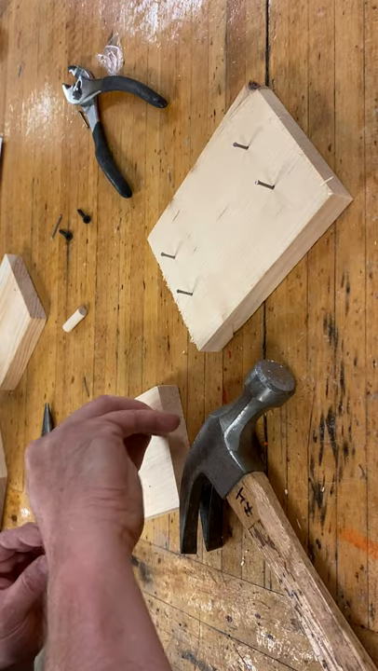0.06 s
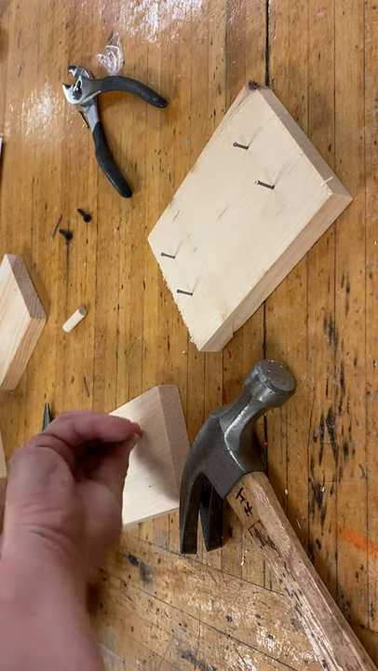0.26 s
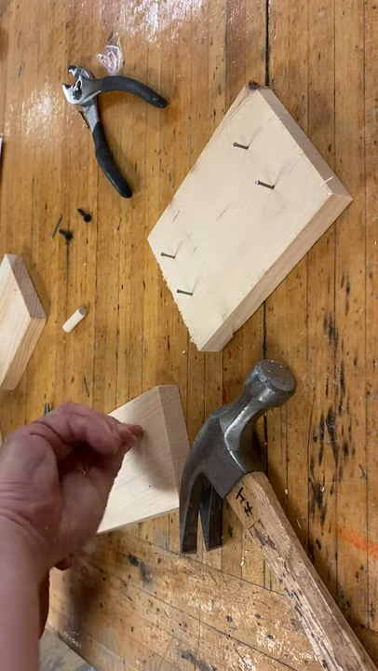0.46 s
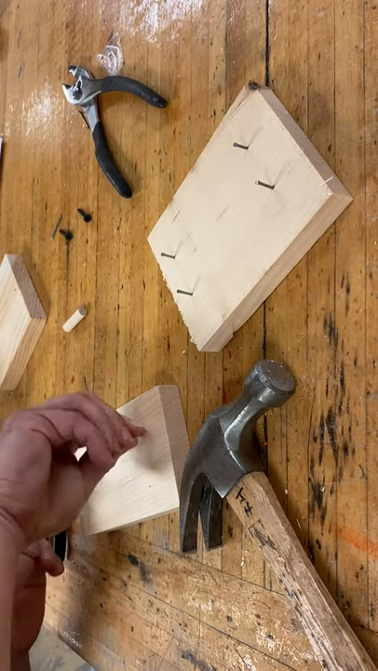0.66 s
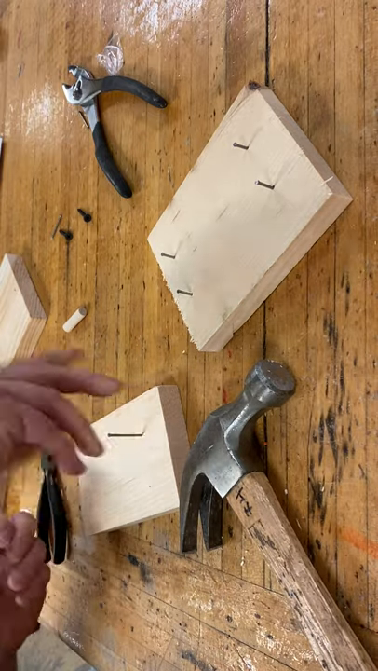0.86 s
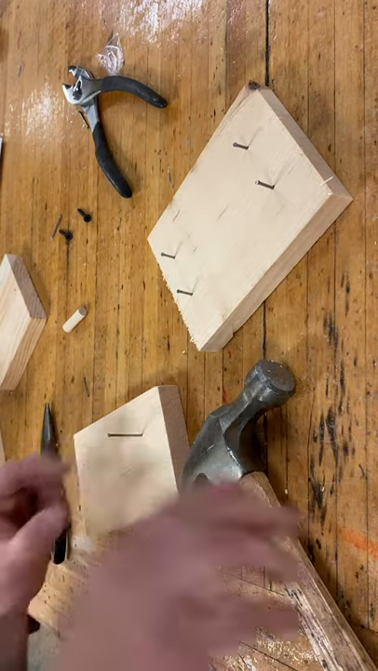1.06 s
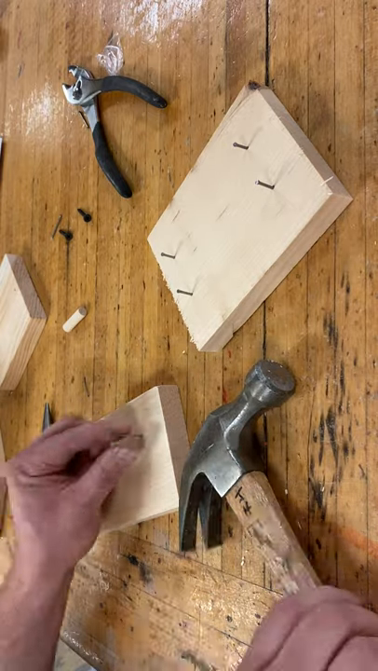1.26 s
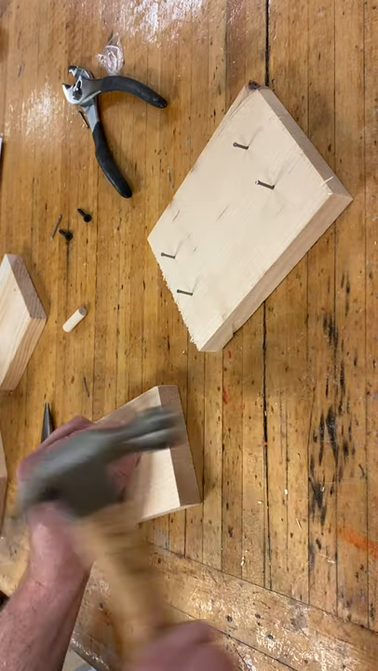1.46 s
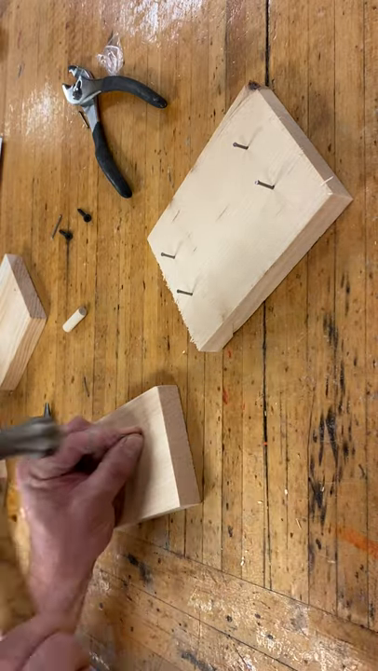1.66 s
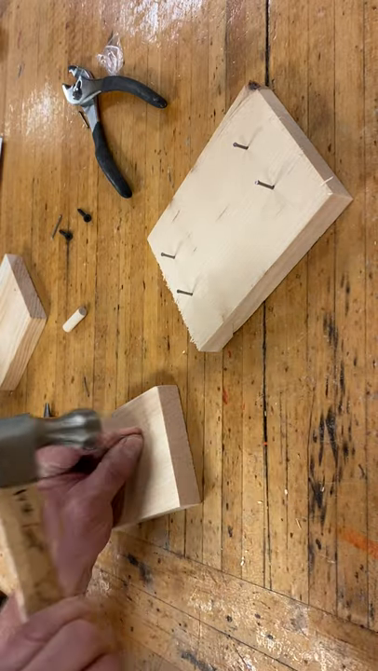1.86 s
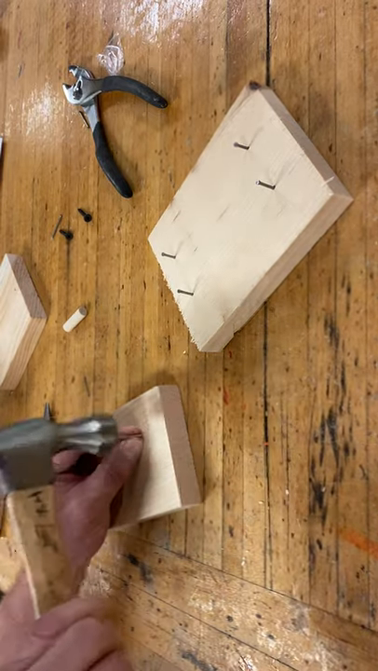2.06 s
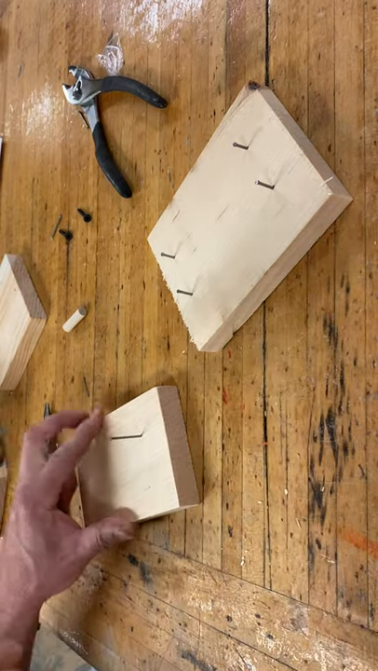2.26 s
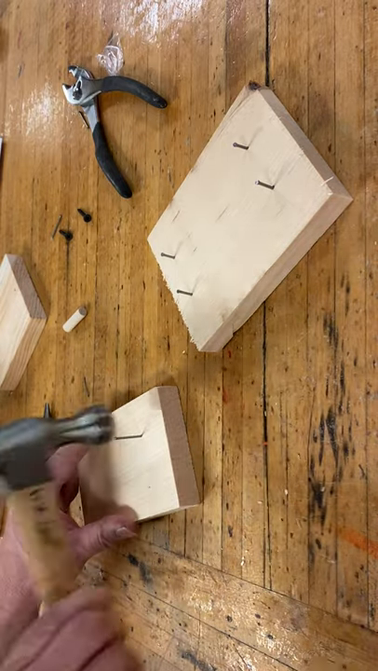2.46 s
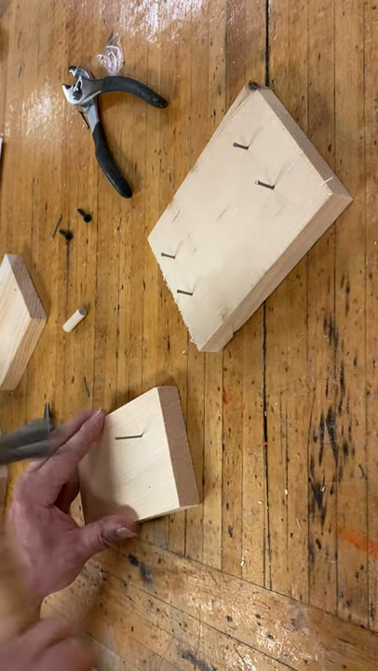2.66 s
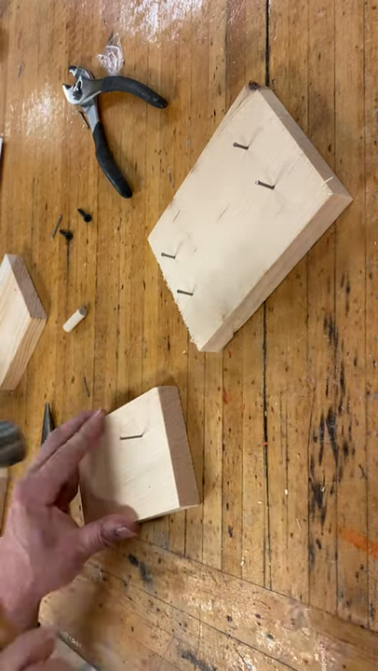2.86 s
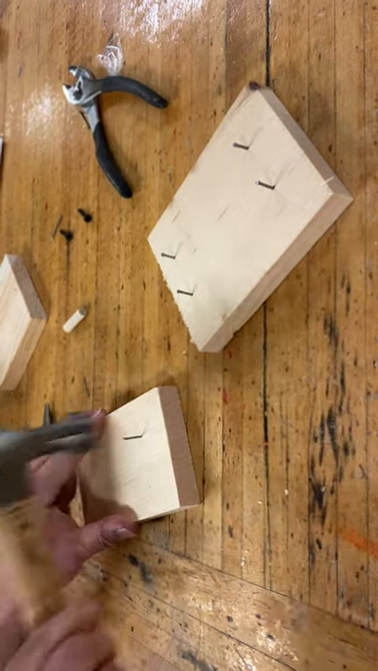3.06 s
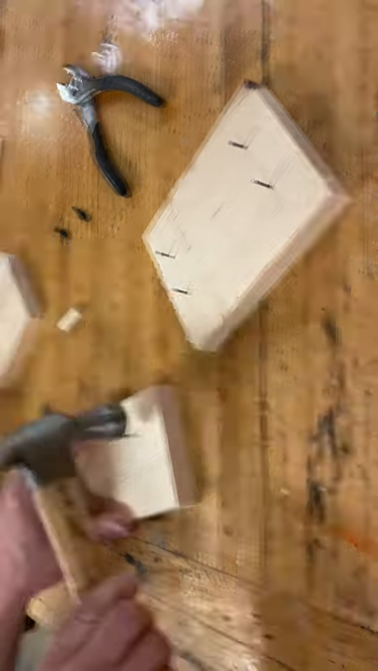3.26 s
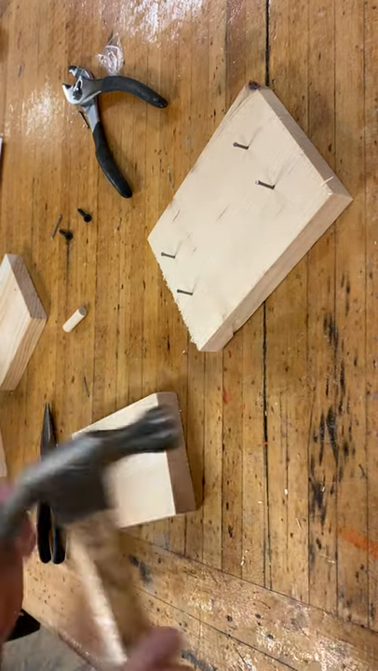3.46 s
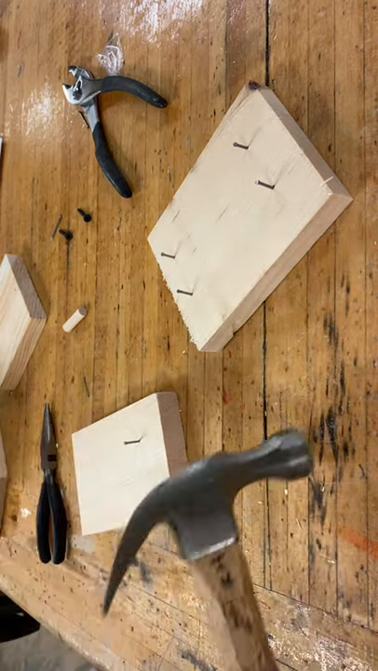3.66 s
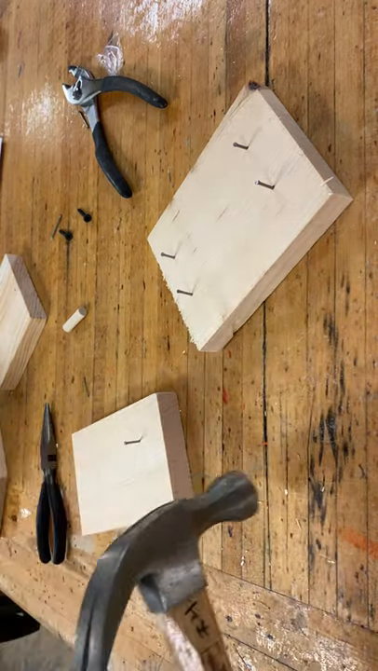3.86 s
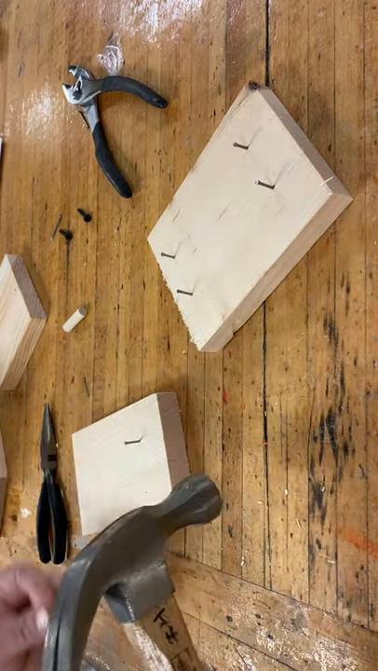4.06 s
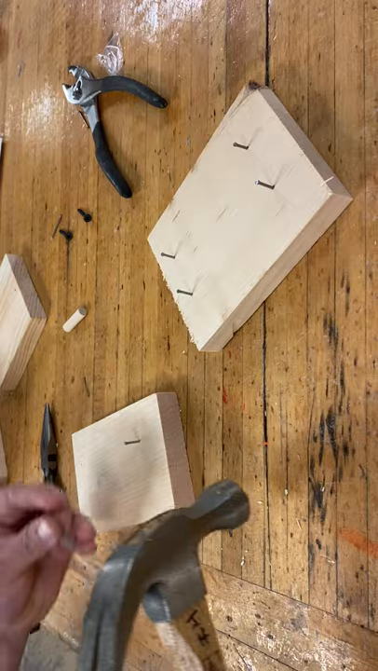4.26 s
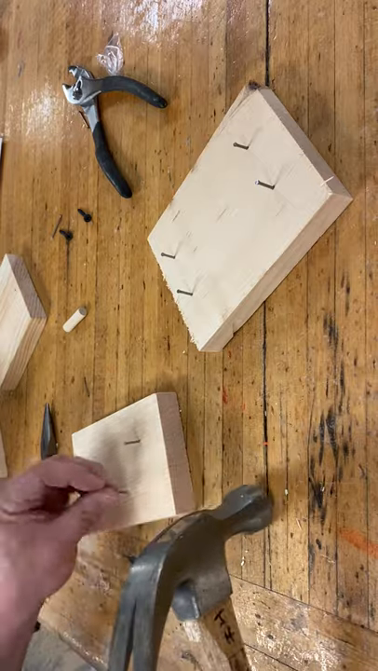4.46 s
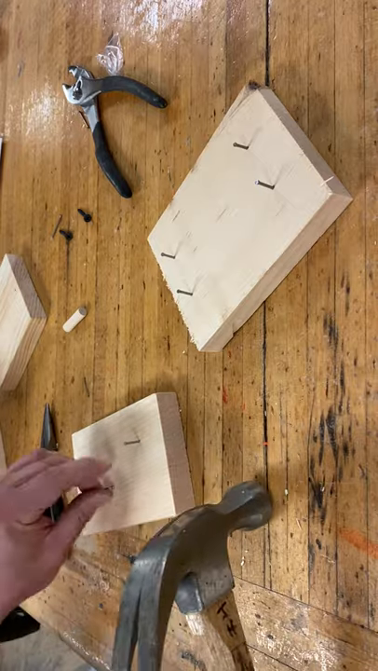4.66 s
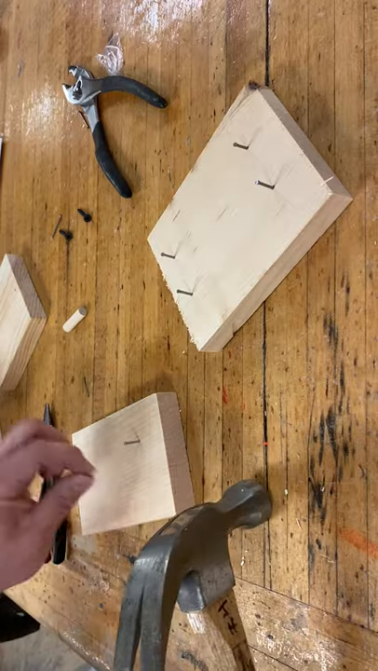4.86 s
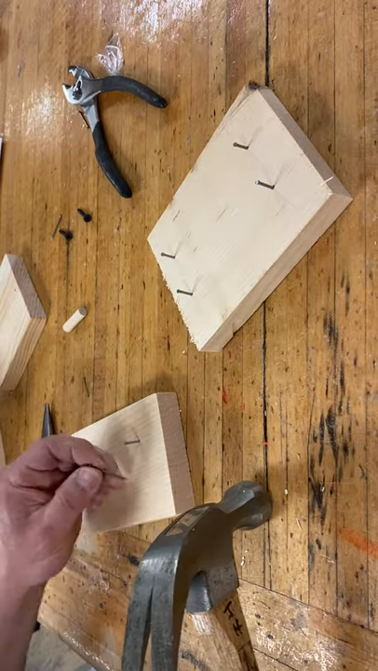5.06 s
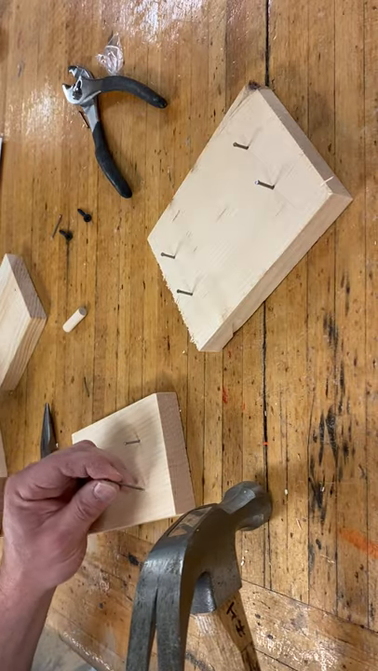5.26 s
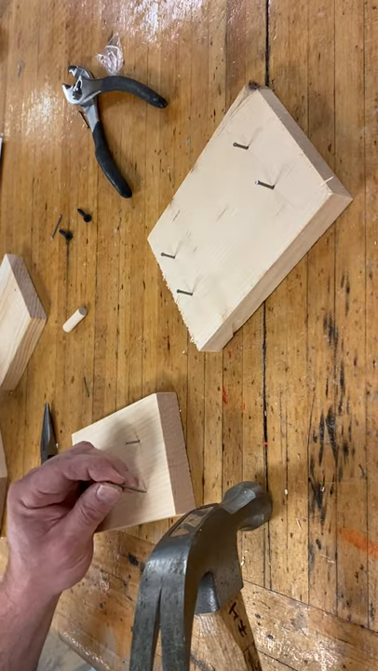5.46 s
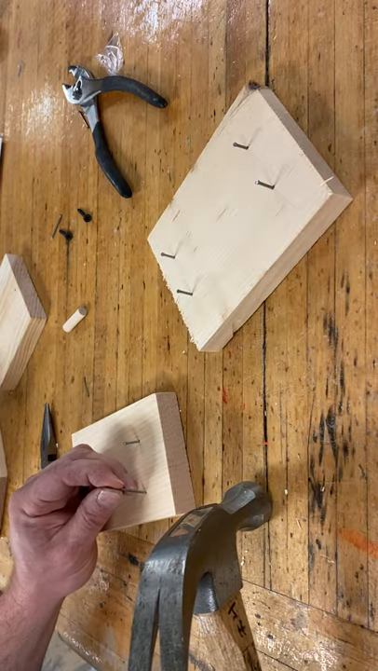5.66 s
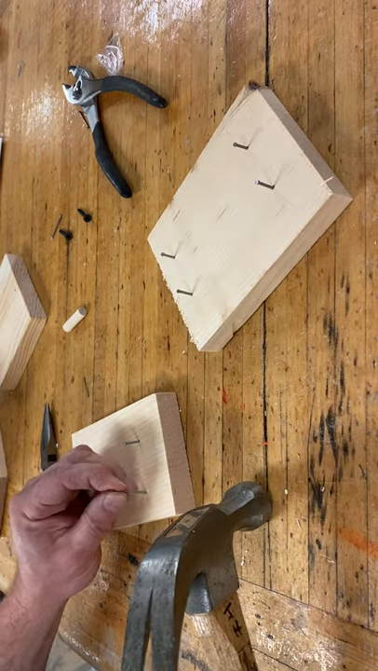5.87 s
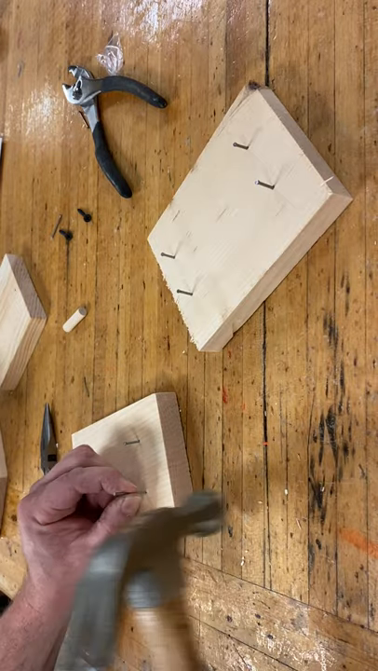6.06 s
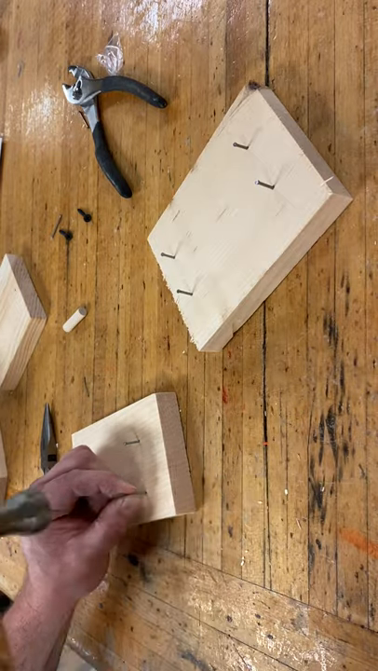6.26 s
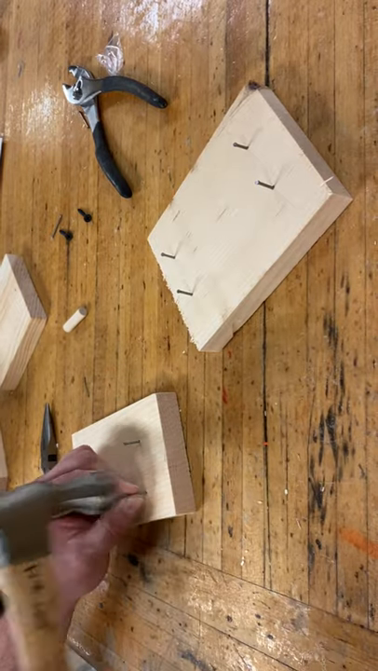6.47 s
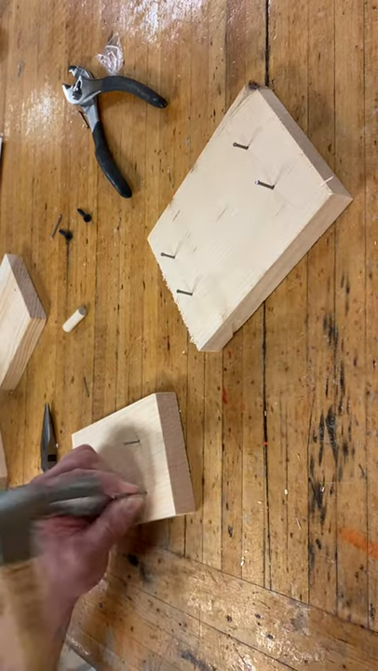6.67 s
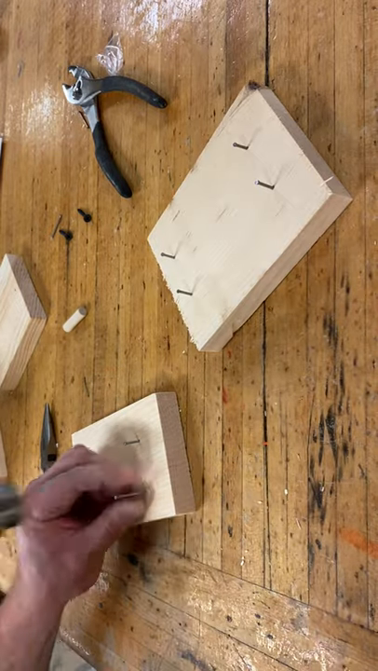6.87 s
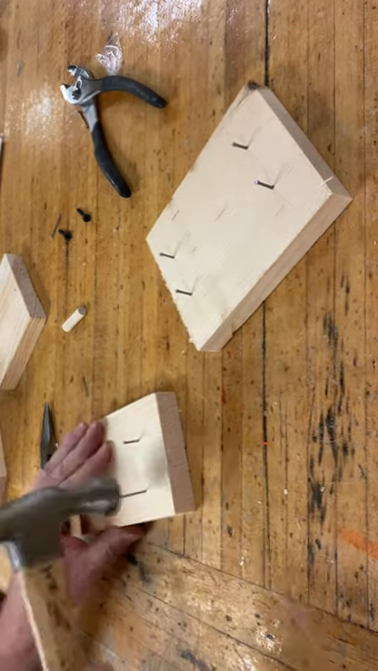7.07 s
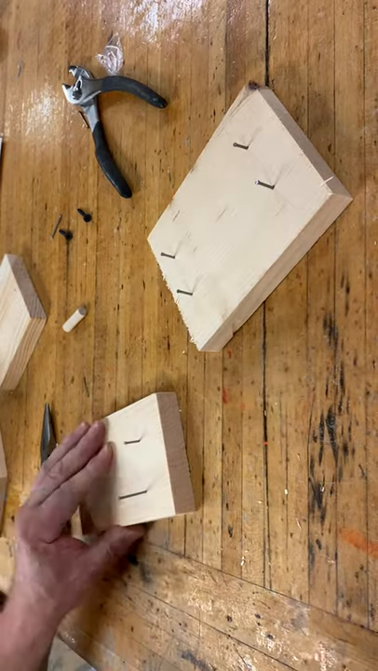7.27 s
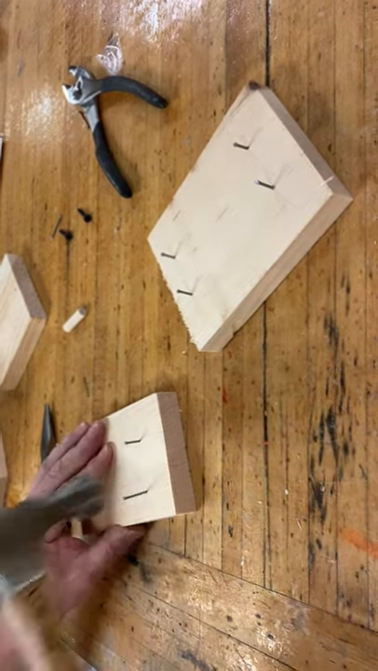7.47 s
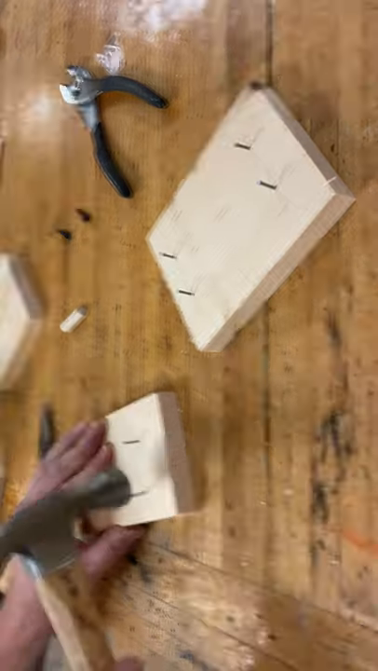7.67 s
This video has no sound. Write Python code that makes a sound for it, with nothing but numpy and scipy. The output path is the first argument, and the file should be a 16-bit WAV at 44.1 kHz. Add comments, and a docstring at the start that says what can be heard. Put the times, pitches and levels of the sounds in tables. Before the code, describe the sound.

Near stereo pickup in a moderately live workshop with steady, faint low hum and airy rumble. Light nail and finger ticks lead into six sharp steel-on-nail cracks, each with woody knock, deep bench thud and short room tail. The hammer lands and rocks on the bench in a brief cluster of knocks. Near-silent fingering follows, then a run of four blows, starting muffled and ending loud and crisp.

```python
"""Fingers rustle and tick on a softwood block (shaped noise); then a claw hammer drives a nail with six blows,
each a sum of damped modes and noise bursts, and loose things on the bench buzz on. The hammer is laid down and
rocks on the heavy bench top, its claw rattling; after more rustling a second run of four blows follows.
Mains hum (two sines) and ventilation (patchy noise) last throughout; decaying diffuse noise is the workshop's
answer to each knock. Two microphone ports a few centimetres apart hear it with unlike phase and level."""
import sys
import numpy as np
from scipy import signal
from scipy.fft import rfft, irfft, next_fast_len
from scipy.io import wavfile
from scipy.ndimage import uniform_filter1d, map_coordinates

SR = 44100
rng = np.random.default_rng(int(sys.argv[2]) if len(sys.argv) > 2 else 0)


def file_out(sig):
    """Save sig as 16-bit WAV at sys.argv[1]."""
    # one column per channel
    cols = np.atleast_2d(sig).T
    # limit, then scale
    lim = np.clip(cols, -1, 1)
    pcm = np.round(lim * 32767).astype(np.int16)
    wavfile.write(sys.argv[1], SR, pcm)


N = 339966

# Blows on the nail: start_s, load_steps (delay until the wood takes the load, in LOAD_STEP_S), tone_hz (block),
# crack_hz (wood), bite_hz (nail), crack_db, tone_db, block_db, bench_db, bite_db, clink_db (face),
# steel_db (treble), low_ring_db and high_ring_db (head), room_db (re blow)
BLOWS = [(1.8180, 1.4, 430, 1160, 1820, -11, -26, -21.5, -14, -34, -34, -27, -51.5, -54, -30.5),
         (2.0791, 0.57, 660, 1284, 1873, -6, -15, -11, -13, -12.5, -18.5, -20, -54, -51.5, -27),
         (2.4517, 0.46, 652, 1330, 2130, -17.5, -18, -14, -12, -12.5, -12, -18.5, -46, -45, -22),
         (2.7653, 0.76, 648, 1276, 2410, -15.5, -19, -13.5, -14.5, -13, -12, -16.5, -52, -49, -24),
         (3.041, 1.2, 650, 1320, 2420, -16.5, -17.5, -12, -14, -12.5, -10.5, -15.5, -63, -48, -27),
         (3.302, 0.82, 602, 1362, 2371, -18.5, -15.5, -11.5, -14.5, -12.5, -10, -16, -54, -50.5, -27.5),
         (6.4615, 1.4, 560, 1404, 1850, -33, -26, -33.5, -15, -37, -38.5, -26.5, -50.5, -59.5, -30.5),
         (6.7540, 0.83, 800, 1007, 2045, -17, -19.5, -19.5, -12, -19.5, -21, -14.5, -55, -38, -25.5),
         (7.131, 1.2, 704, 1176, 3590, -13, -10.5, -9.5, -9.5, -12.5, -24, -8, -43, -52, -28),
         (7.446, 1.1, 713, 1236, 3430, -11.5, -9.5, -9.5, -9.5, -13, -15.5, -8, -38.5, -35, -26)]
LOAD_STEP_S, CRACK_RISE_S, BLOCK_TONE_T60_S = 0.00091, 0.0009, 0.038
# Weights of the parts in the room: crack, steel, block, clink and tone, each re its own direct level
ROOM_CRACK_DB, ROOM_STEEL_DB, ROOM_BLOCK_DB, ROOM_CLINK_DB, ROOM_TONE_DB = -2.5, -10, 5, -5.5, 0.5
# Short narrow tones swelling just before some blows: start_s, length_s, first_hz, level_db
LEAD_TONES = [(2.4405, .008, 3140, -34), (2.7562, .0075, 2658, -24.5), (3.032, .007, 2780, -22.5),
              (3.29, .0125, 2565, -18), (7.1224, .006, 3077, -30.5), (7.435, .007, 2910, -31)]
TONE_GLIDE, TONE_SWELL_DB, TONE_NOISE_DB = 1.1, 10, -5  # last over first pitch, swell, noise re tone
# Steel contact spectrum: frequency_hz, level_db (per Hz)
STEEL_SPECTRUM = [(6000, -23), (7000, -5.5), (9500, -3.5), (12000, -12), (15500, -6), (16300, -25.5),
                  (17000, -36.5)]
FACE_HZ, FACE_DB, FACE_T60_S = 9680, -12, 0.005  # short high ring of the hammer face, re steel treble
# Modes of the steel hammer head: frequency_hz, t60_s
HEAD_MODES = [(4511, 0.18), (5740, 0.21), (6800, .12)]
HEAD_TOP_DB = -5.5  # highest ring re the lowest
# Modes of the softwood block: frequency_hz, level_db (relative), t60_s
BLOCK_MODES = [(279, 5, 0.025), (350.1, -4, 0.067), (570, -3.5, 0.05), (1360, -12, 0.072),
               (2470, -17.5, 0.051), (3150, -21.5, 0.032)]
# Modes of the bench top: frequency_hz, level_db (relative), t60_s
BENCH_MODES = [(50, -28, 0.21), (61.97, -7.5, 1), (74.42, 7.5, 0.16), (84.2, -18.5, 0.95), (100, -30, 0.56),
               (108.37, -6, 0.43), (137, -6, 0.21), (155.75, -15, 0.18), (171, -25, .25),
               (180.2, -12.5, 0.36), (203, -19, 0.67), (221, -7, 0.055), (317, -29, 0.08),
               (348.9, -10, 0.17), (410.1, -6, 0.099)]
# Loose low rattle of the bench; softer thuds stretch its frequencies: frequency_hz, level_db (per Hz)
THUD_SPECTRUM = [(30, -32), (60, 2.5), (150, 5.5), (300, -6.5), (600, -21.5), (1200, -34.5), (2500, -51.5)]

# Loose things buzzing after blows of the first run: start_s, hold_s, level_db (rms before sag and rise)
RATTLES = [(2.085, .15, -57), (2.46, .15, -51), (2.775, .18, -47.5), (3.05, .2, -44.5), (3.31, .22, -45.5)]
RATTLE_SAG_DB_PER_S, RATTLE_FALL_DB_PER_S, RATTLE_GRAIN_DB = 35, 169, 2.5
# Spectrum of the buzz: frequency_hz, level_db (per Hz)
RATTLE_SPECTRUM = [(300, -40.5), (600, -9.5), (1100, -7.5), (1500, -5), (1800, -1.5), (2300, 1.5),
                   (2650, 0.5), (3000, -8.5), (4100, -12.5), (5100, -8), (6200, -14.5), (7200, -40.5)]
RATTLE_PEAKS_DB, RATTLE_PEAK_HZ = 4, 45  # many narrow resonances: depth and spacing

# The hammer landing and rocking: start_s, knock_db, bench_db, edge_db (edge of the contact) and
# claw_db (claw rattle), these three re knock, claw_hz
KNOCKS = [(3.680, -10.5, -14, -24.5, -24.5, 4300), (4.472, -6.5, -15.5, -20.5, -25, 4364),
          (4.512, -25.5, -2.5, -27, -19.5, 3300), (4.586, -9.5, -16, -20, -27.5, 4350),
          (4.634, -16.5, -18.5, -28, -43.5, 4600), (4.661, -22.5, -3.5, -22.5, -33, 5200),
          (4.7, -35, -1, -38, -42, 4540), (4.761, -48, -3, -27.5, -9, 3610)]
# Modes of the bench under the laid hammer: frequency_hz, level_db (relative), t60_s
LAID_MODES = [(183, -9.5, 0.19), (228.5, -13.5, 0.33), (311.8, 6, 0.043), (369.6, -7.5, 0.05),
              (463, -14, 0.24), (487, -5, 0.07), (560, 1.5, 0.046), (659, -24.5, 0.13), (737, -23.5, 0.17),
              (900, -19.5, 0.016), (968, -30, 0.14), (1227, -22.5, 0.078)]
KNOCK_RISE_S, CLAW_AFTER_S = .0016, .007

# Ticks of nails and fingers: start_s, tick_db, thump_db (re tick), tap_db (woody, re tick)
TICKS = [(0.211, -62, -16, -15), (0.2442, -62.5, -18.5, -11), (0.9448, -71, 22.5, -10),
         (0.982, -69, -20, 6), (1.17, -62, -17, -8), (1.2118, -58.5, 10, 3), (1.226, -58.5, 16.5, -10),
         (1.2348, -55, 16.5, -11), (1.343, -73, 25, -9), (1.3574, -62, 6, -9), (1.4044, -67.5, 30.5, 0),
         (1.4163, -60, 23.5, 10), (1.424, -56.5, 14, 4), (1.4975, -71, 21.5, -10), (1.546, -57.5, 1, -10),
         (5.348, -74.5, 0, 2), (5.5995, -71, 6, 5.5), (5.6699, -67, 11, -1), (6.3801, -75, 8, -6),
         (7.0584, -51.5, 10.5, -11.5)]
FAINT_DB, FAINT_THUMP_DB, FAINT_TAP_DB = -78, 5.5, 1.5  # fainter ticks at random moments
FAINT_SCATTER_DB = 2.5
# Spectrum of skin on wood: frequency_hz, level_db (per Hz)
SKIN_SPECTRUM = [(350, -27), (700, -2), (2500, -6.5), (5000, -6), (10000, -10.5), (15500, -13),
                 (16300, -35), (17000, -52)]
# Skin sliding on wood: start_s, hold_s, level_db (rms while held)
STROKES = [(0.825, 0.0065, -61), (0.987, .01, -73.5), (1.213, 0.013, -67), (1.273, 0.011, -60.5),
           (1.353, 0.19, -78.5), (2.187, 0.09, -60), (4.774, 0.033, -74.5), (4.93, 0.0086, -77),
           (5.036, 0.0096, -83.5), (5.14, 0.009, -85), (6.007, 0.015, -81), (6.145, 0.019, -86.5),
           (6.388, 0.0066, -77.5), (6.949, 0.013, -63), (7.107, 0.038, -59.5)]
RISE_DB_PER_S, FALL_DB_PER_S = 352, 246.5
GRAIN_DB = 3.5  # skin catches and slips on the grain
# A faint thin squeak under the fingers: start_s, length_s, pitch_hz, level_db (rms at its height)
SQUEAK = (1.33, .12, 4800, -80)
# Short faint scuffs, each around one pitch: start_s, length_s, pitch_hz, level_db (rms before shaping)
SCUFFS = [(.07, .05, 1050, -75), (0.241, 0.045, 1150, -81), (.245, .08, 5300, -83), (0.408, .07, 1100, -72),
          (.43, .07, 5000, -86), (.605, 0.044, 1100, -75), (.61, 0.065, 5000, -86), (1.168, .04, 1200, -74),
          (1.207, 0.047, 950, -60), (1.72, .025, 1300, -76), (2.3, 0.017, 3900, -64), (2.3, .02, 5400, -70),
          (4.878, 0.076, 1250, -74), (4.925, 0.033, 3005, -78.5), (5.0, 0.076, 1000, -82),
          (5.11, .04, 4790, -83), (5.345, 0.048, 1693, -82.5), (5.421, 0.054, 1300, -81),
          (5.553, .05, 1050, -83), (5.952, 0.084, 698, -78), (5.971, .08, 1996, -85),
          (6.001, .04, 5320, -86), (6.127, .06, 5000, -83.5), (6.142, 0.089, 780, -79.5),
          (6.17, .07, 1698, -85.5), (6.331, 0.083, 1404, -81), (6.973, .02, 5200, -64)]
SCUFF_WIDTH = 0.13  # log bandwidth

# Workshop background: frequency_hz, level_db (per Hz, relative)
AIR_SPECTRUM = [(15, -58.5), (30, -20), (52, -7), (62, -2.5), (85, -11), (150, -12.5), (260, -19),
                (430, -26.5), (560, -34), (850, -38.5), (1300, -41), (2500, -48), (5000, -55),
                (10000, -56.5), (15700, -69.5), (16200, -92.5)]
AIR_DB = -57  # rms
# Mains hum: pitch_hz, level_db (rms)
HUM = [(59.6, -70), (119.3, -50.5)]
# Early decay of the workshop: frequency_hz, t60_s
ROOM_DECAY = [(100, 0.93), (400, 0.46), (1000, 0.27), (1600, 0.4), (2300, 0.32), (3500, 0.39), (5000, 0.28),
              (7000, 0.36), (14000, 0.16)]
# Colour of the workshop's answer: frequency_hz, level_db
ROOM_COLOUR = [(100, 5), (500, -5.5), (1000, -0.5), (1600, -4.5), (2300, 2), (3200, -3), (4200, -4),
               (5100, -5), (7000, -11), (11000, 0.5), (16000, 4)]
LATE_DB, LATE_LONGER = -10, 1.836  # the far end of the workshop answers weaker and dies slower
ROOM_UNEVEN_DB = 2.5  # neighbouring frequencies of the tail differ in level
# Diffuse sound at the ports: frequency_hz, likeness (left-right correlation, 0 to 1)
LIKENESS = [(100, .99), (300, .85), (700, .35), (2000, .4), (4000, .6), (6000, .99)]
# Phase between the ports: frequency_hz, left_lead_rad
LEFT_LEAD = [(0, 0), (550, -.4), (1100, .3), (1800, 0), (2700, 1.5), (3400, .8), (5200, .6), (7200, np.pi),
             (16500, 4 * np.pi)]
# Level between the ports: frequency_hz, left_minus_right_db
LEFT_TILT = [(30, -.7), (125, -1.6), (250, -3), (550, -5.5), (1100, -1.8), (2000, -.5), (4400, -1),
             (5300, 1.5), (7000, .3)]
TOP_HZ = 17000
CEILING, KNEE = .95, 6  # the loudest peaks are rounded off


def blows():
    """Impact excitation: each blow cracks on the nail, rings head, block and bench, and fills the room."""
    out, t = np.zeros((2, N + 2 * SR)), np.arange(SR // 2) / SR
    wood = lambda f: hump(f, 1024, 0.6)
    clink = lambda f: hump(f, 5600, 0.26)
    steel = lambda f: amp(along(STEEL_SPECTRUM, f))
    block = lambda f: hump(f, 436, 0.38)
    swell = 1 - np.exp(-(t / CRACK_RISE_S) ** 2)
    for start, length, first_hz, lead_db in LEAD_TONES:
        add(out, start, amp(lead_db) * lead_tone(first_hz, length))
        add(out, start + length, amp(lead_db - 19.5) * room(lambda f: spike(f, first_hz, 45)))
    for start, load_steps, tone_hz, crack_hz, bite_hz, *levels_db in BLOWS:
        crack_db, tone_db, block_db, bench_db, bite_db, clink_db, steel_db, *head_db, room_db = levels_db
        bite = lambda f: hump(f, bite_hz * 0.8, 0.74)
        tone = lambda f: hump(f, tone_hz, 0.16)

        # steel meets steel first; the face touches again on the rebound
        rebound = np.roll(burst(t, 0.052, steel), round(0.0037 * SR))
        spark = burst(t, 0.01, steel) + amp(-17.0) * rebound
        spark += amp(FACE_DB) * ring([(FACE_HZ, 0, FACE_T60_S)], t, 0)
        add(out, start, amp(steel_db) * spark + head(t, head_db))

        nail = ring([(bite_hz, 0, .015)], t, 1.5)
        nail += amp(6.5) * burst(t, 0.025, bite) + amp(-7.5) * burst(t, 0.17, bite)
        add(out, start + 0.0006, amp(bite_db) * nail + amp(clink_db) * burst(t, 0.021, clink))

        # the wood takes the load a moment later
        crack = 1.8 * swell * ring([(crack_hz, 0, .009)], t, 1.5)
        crack += amp(-6.5) * burst(t, 0.057, wood, attack=0.001)
        body = amp(block_db) * ring(BLOCK_MODES, t, 1.3, travel=0.016) + amp(bench_db) * bench(t)
        body += amp(tone_db) * ring([(tone_hz, 0, BLOCK_TONE_T60_S)], t, 1, travel=0.04)
        add(out, start + load_steps * LOAD_STEP_S, amp(crack_db) * crack + body)

        # the room answers the whole blow, each part with its own weight
        weights = amp([crack_db + ROOM_CRACK_DB, bite_db, clink_db + ROOM_CLINK_DB,
                       steel_db + ROOM_STEEL_DB, block_db + ROOM_BLOCK_DB, tone_db + ROOM_TONE_DB])
        parts = wood, bite, clink, steel, block, tone
        answer = room(lambda f: sum(w * part(f) for w, part in zip(weights, parts)))
        add(out, start, amp(room_db) * np.linalg.norm(weights) * answer)
    return out[:, :N]


def lead_tone(first_hz, length):
    """Gliding tone: a short rising tone with narrow noise swells up to the blow."""
    u = np.linspace(0, 1, round(length * SR))
    tone = np.sin(2 * np.pi * np.cumsum(first_hz * TONE_GLIDE ** u) / SR)
    noise = rng.standard_normal(len(u))
    narrow_noise = unit(filtered(noise, lambda f: spike(f, first_hz * TONE_GLIDE, 120)))
    swell = amp(-TONE_SWELL_DB * (1.0 - u)) * np.minimum(8 * u, 1)
    return swell * (tone + amp(TONE_NOISE_DB) * narrow_noise)


def head(t, levels_db):
    """Free vibration: the steel head's clear rings are exponentially damped sines."""
    all_db = [*levels_db, levels_db[0] + HEAD_TOP_DB]
    return sum(amp(db - 60 * t / t60) * np.sin(2 * np.pi * hz * t)
               for (hz, t60), db in zip(HEAD_MODES, all_db))


def bench(t):
    """Modal plate vibration: the bench top's modes, roughened by everything loose that lies on it."""
    loose = burst(t, 0.45, lambda f: amp(along(THUD_SPECTRUM, f)), attack=0.0017)
    return -ring(BENCH_MODES, t, 1.2, travel=0.0698) + amp(-6.5) * loose


def rattles():
    """Repeated loose contact: a grainy resonant buzz sags while it lasts, then dies away."""
    out, t = np.zeros((2, N + SR)), np.arange(SR // 2) / SR
    knots_db = RATTLE_PEAKS_DB * rng.standard_normal(2000)
    peaks_db = lambda f: map_coordinates(knots_db, [f / RATTLE_PEAK_HZ])
    colour = lambda f: amp(along(RATTLE_SPECTRUM, f) + peaks_db(f))
    for start, hold, db in RATTLES:
        grain = amp(RATTLE_GRAIN_DB * wander(len(t), 100))
        buzz = unit(filtered(grain * diffuse(rng.standard_normal((2, len(t)))), colour))
        level_db = db - RATTLE_SAG_DB_PER_S * t - RATTLE_FALL_DB_PER_S * np.maximum(t - hold, 0)
        add(out, start, amp(level_db) * np.minimum(t / .02, 1) * buzz)
    return out[:, :N]


def knocks():
    """Soft impact: the laid hammer's slow contact excites the wood; its claw rattles a moment later."""
    out, t = np.zeros((2, N + 2 * SR)), np.arange(SR // 2) / SR
    dull = lambda f: amp(along(THUD_SPECTRUM, f / 2.5))
    rise = 1 - np.exp(-(t / KNOCK_RISE_S) ** 2)
    for start, db, bench_db, edge_db, claw_db, claw_hz in KNOCKS:
        bright = lambda f: spike(f, claw_hz, 100)
        wood = rise * ring(LAID_MODES, t, 0.71, travel=0.015)
        wood += amp(-11.5) * burst(t, 0.074, dull, attack=0.00095)
        edge = burst(t, 0.012, lambda f: spike(f, 1300, 60), attack=0.00076)
        edge += amp(-12) * burst(t, .12, lambda f: hump(f, 2200, .6))
        add(out, start, amp(db) * (wood + amp(edge_db) * edge + amp(bench_db) * bench(t)))
        add(out, start, amp(db - 25.5) * room(lambda f: dull(f) + amp(-7.5) * hump(f, 700, .3)))
        claw = burst(t, 0.05, bright) + amp(-13.0 - 60 * t / 0.052) * np.sin(2 * np.pi * 4250 * t)
        add(out, start + CLAW_AFTER_S, amp(db + claw_db) * claw)
        add(out, start + CLAW_AFTER_S, amp(db + claw_db - 27.0) * room(bright))
    return out[:, :N]


def ticks():
    """Light impact: nails and fingers tick on the wood as short bursts and the room answers faintly."""
    out, t = np.zeros((2, N + 2 * SR)), np.arange(SR // 4) / SR
    soft = lambda f: amp(along(THUD_SPECTRUM, f / 1.7))
    for start, db, thump_db, tap_db in [*TICKS, *faint_ticks(count=45)]:
        thump = burst(t, 0.085, soft, attack=0.0047)  # soft flesh on wood
        tap = burst(t, 0.1, lambda f: spike(f, 1200, 40))
        tick = burst(t, 0.04, skin) + amp(thump_db) * thump + amp(tap_db) * tap
        add(out, start, amp(db) * tick)
        add(out, start, amp(db - 20.5) * room(skin))
    return out[:, :N]


def faint_ticks(count):
    """Random arrivals: rows like those of TICKS at uniformly drawn moments."""
    when = rng.random(count) * N / SR
    scatter_db = FAINT_SCATTER_DB * rng.standard_normal((count, 3))
    return np.column_stack([when, scatter_db + [FAINT_DB, FAINT_THUMP_DB, FAINT_TAP_DB]])


def strokes():
    """Sliding friction: skin on wood makes noise whose level wavers as it catches and slips."""
    now = np.arange(N) / SR
    level = 0
    for start, hold, db in STROKES:
        rise_db = RISE_DB_PER_S * np.maximum(start - now, 0)
        fall_db = FALL_DB_PER_S * np.maximum(now - start - hold, 0)
        level = level + amp(db - rise_db - fall_db)
    grain = amp(GRAIN_DB * wander(N, 150))
    return level * unit(grain * filtered(rng.standard_normal(N), skin))


def squeak():
    """Narrow-band noise: a thin squeak under the fingers swells and fades."""
    start, length, hz, db = SQUEAK
    noise = unit(filtered(rng.standard_normal(N), lambda f: spike(f, hz, 6)))
    phase = np.clip((np.arange(N) / SR - start) / length, 0, 1)
    return amp(db) * np.sqrt(np.sin(np.pi * phase).clip(0)) * noise


def skin(f):
    """Source spectrum: gain of skin on wood against frequency."""
    return amp(along(SKIN_SPECTRUM, f))


def scuffs():
    """Band-limited noise: brief narrow rustles of fingers, nails and sleeve."""
    out = np.zeros((2, N + SR))
    for start, length, hz, db in SCUFFS:
        u = np.linspace(0, 1, round(length * SR))
        noise = unit(filtered(rng.standard_normal(len(u)), lambda f: hump(f, hz, SCUFF_WIDTH)))
        add(out, start, amp(db) * np.minimum(6 * u, 1) * np.sqrt(1 - u) * noise)
    return out[:, :N]


def workshop():
    """Stationary background: ventilation rumble and patchy hiss under a steady mains hum."""
    z = signal.stft(diffuse(rng.standard_normal((2, N))), nperseg=512)[2]
    patches = smooth(rng.standard_normal(z.shape[1:]), bands=12, frames=10)
    patchy = signal.istft(z * amp(2.9 * unit(patches)), nperseg=512)[1][:, :N]
    air = unit(filtered(patchy, lambda f: amp(along(AIR_SPECTRUM, f))))
    t = np.arange(N) / SR
    waver_db = .4 * wander(N, SR // 4)
    hum = sum(np.sqrt(2) * amp(db + waver_db) * np.sin(2 * np.pi * hz * t) for hz, db in HUM)
    return amp(AIR_DB) * air + hum


def room(colour):
    """Reverberation: diffuse noise of the knock's colour, every frequency dying at its own speed."""
    hz, t, z = signal.stft(diffuse(rng.standard_normal((2, SR))), SR, nperseg=256)
    uneven = unit(smooth(rng.standard_normal(z.shape[1:]), bands=2, frames=70))
    fall_db = -60 * t / along(ROOM_DECAY, hz)[:, None]
    decay = np.hypot(amp(fall_db), amp(LATE_DB + fall_db / LATE_LONGER))
    tail = signal.istft(z * amp(ROOM_UNEVEN_DB * uneven) * decay, SR, nperseg=256)[1]
    tail = filtered(tail, lambda f: colour(f) * amp(along(ROOM_COLOUR, f)))
    u = np.arange(tail.shape[1]) / SR
    build_up = 1 - np.exp(-u / 0.005)  # echoes gather over the first milliseconds
    return build_up * tail / np.std(tail[:, :1024])


def diffuse(pair):
    """Spatial coherence: two unrelated noises mixed to the likeness of a diffuse field."""
    turn = lambda hz: np.arccos(np.clip(along(LIKENESS, hz), -1, 1)) / 2
    mid, side = filtered(pair, lambda hz: np.array([np.cos(turn(hz)), np.sin(turn(hz))]))
    return np.array([mid + side, mid - side])


def ring(modes, t, scatter_db, travel=0.0):
    """Modal synthesis with dispersion: damped modes at peak 1; slower bass bending waves start later."""
    hz, db, t60 = np.transpose(modes)[:, :, None]
    u = np.maximum(t - travel / np.sqrt(hz), 0)
    sense = (-1.) ** np.arange(len(hz))[:, None]  # neighbours swing in opposite sense
    level = sense * amp(db + scatter_db * rng.standard_normal(hz.shape) - 60 * u / t60)
    onset = 1 - np.exp(-u * hz * 3)
    x = (level * np.sin(2 * np.pi * hz * u) * onset).sum(axis=0)
    return x / np.abs(x).max()


def burst(t, t60, colour, attack=0.000099):
    """Exponential decay: a coloured noise burst at peak 1 dies by 60 dB in t60 seconds."""
    noise = filtered(rng.standard_normal(len(t)), colour)
    x = noise * amp(-60 * t / t60) * (1 - np.exp(-t / attack))
    return x / np.abs(x).max()


def hump(f, hz, width):
    """Broad resonance: a bell-shaped band on a log axis."""
    return np.exp(-(np.log((f + 1) / hz) / width) ** 2)


def spike(f, hz, hz_per_db):
    """Narrow resonance: a band falling 1 dB for every hz_per_db away from its centre."""
    return amp(-abs(f - hz) / hz_per_db)


def wander(length, step):
    """Slow modulation: random values every step samples, joined by a smooth curve."""
    return map_coordinates(rng.standard_normal(length // step + 4), [np.arange(length) / step])


def smooth(field, bands, frames):
    """Local averaging: a time-frequency field smoothed over bands and frames."""
    return uniform_filter1d(uniform_filter1d(field, size=bands, axis=0), size=frames, axis=1)


def filtered(x, response):
    """Linear filtering: the spectrum of x times a complex response of frequency."""
    m = next_fast_len(x.shape[-1] + 4096)
    return irfft(rfft(x, m) * response(np.fft.rfftfreq(m, 1 / SR)), m)[..., :x.shape[-1]]


def along(points, hz):
    """Logarithmic interpolation: (frequency, value) points read on a log axis."""
    f, v = np.transpose(points)
    return np.interp(np.log(hz + 1), np.log(f + 1), v)


def amp(db):
    """Decibel law: dB to amplitude gain."""
    return 10 ** (np.asarray(db) / 20)


def unit(x):
    """Power normalisation: x at rms 1."""
    return x / np.sqrt(np.mean(x ** 2) + 1e-20)


def add(out, start, x):
    """Superposition: mix x into out from start seconds."""
    i = round(start * SR)
    out[:, i:i + x.shape[-1]] += x


def scene():
    """Superposition: all sources summed at the microphone."""
    fingers = ticks() + strokes() + squeak()
    return blows() + rattles() + knocks() + fingers + scuffs() + workshop()


def record(dry):
    """Two-port reception: phase and level differ, peaks are rounded, a band limit cuts the top."""
    sides = np.array([[.5], [-.5]])  # half of each difference to left and right
    tilt = lambda f: amp(sides * along(LEFT_TILT, f))
    lead = lambda f: np.exp(1j * sides * np.interp(f, *np.transpose(LEFT_LEAD)))
    ports = filtered(dry, lambda f: tilt(f) * lead(f))
    rounded = ports / (1 + np.abs(ports / CEILING) ** KNEE) ** (1 / KNEE)
    return filtered(rounded, lambda f: f < TOP_HZ)


dry = scene()
out = record(dry)
file_out(out)
```